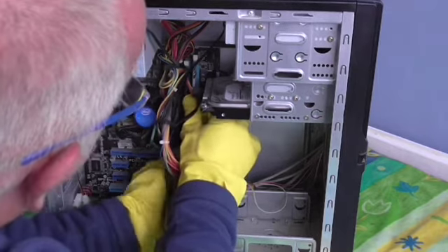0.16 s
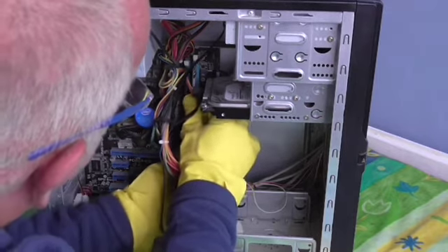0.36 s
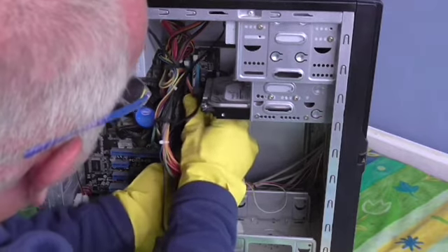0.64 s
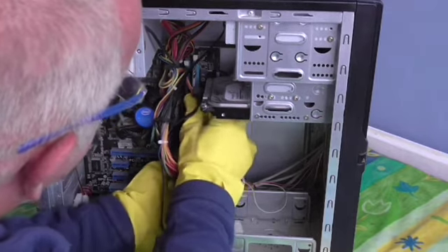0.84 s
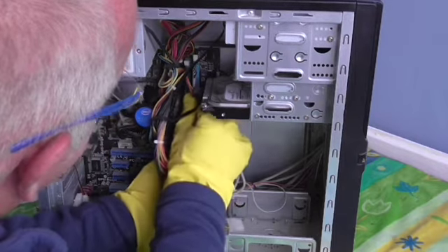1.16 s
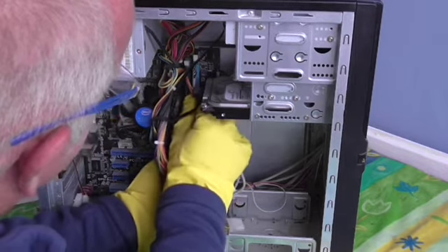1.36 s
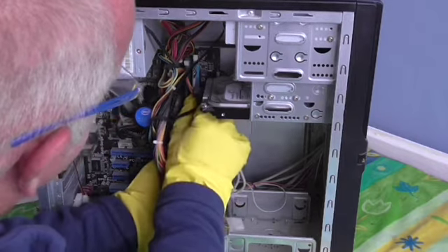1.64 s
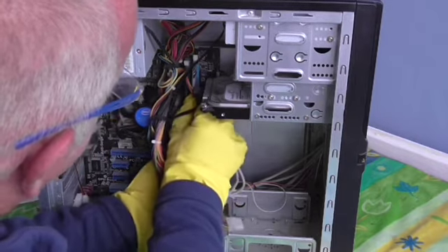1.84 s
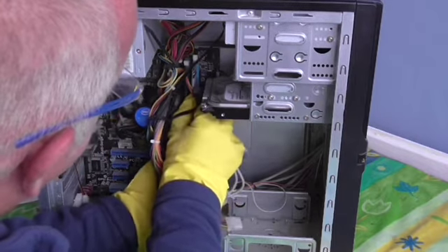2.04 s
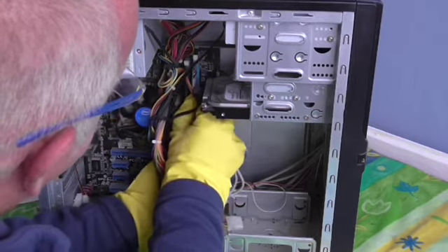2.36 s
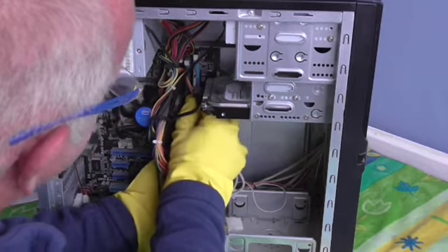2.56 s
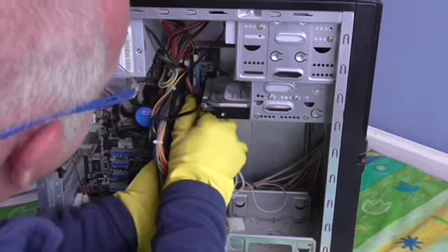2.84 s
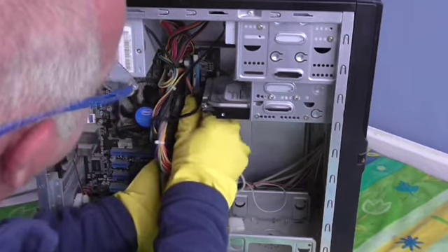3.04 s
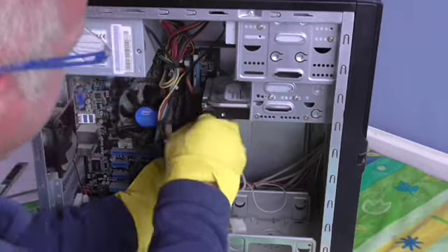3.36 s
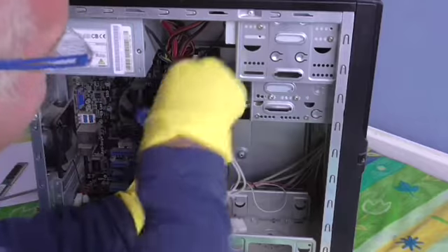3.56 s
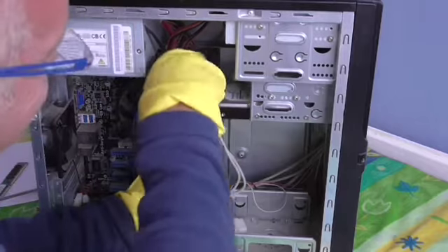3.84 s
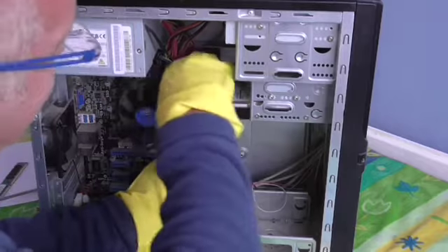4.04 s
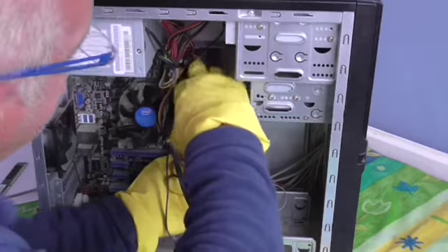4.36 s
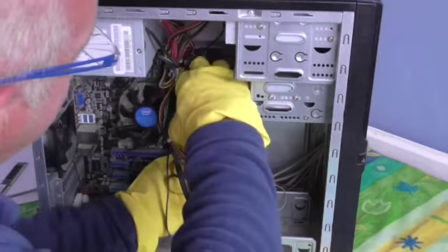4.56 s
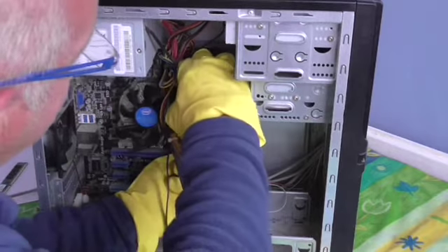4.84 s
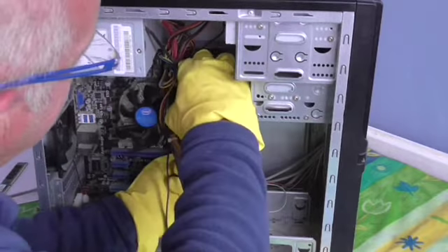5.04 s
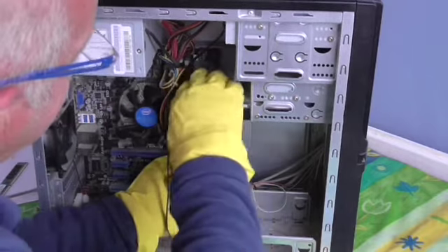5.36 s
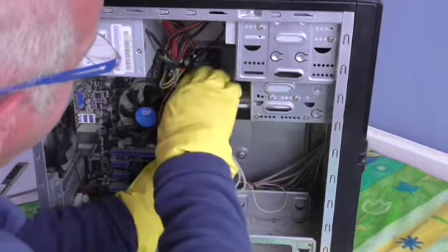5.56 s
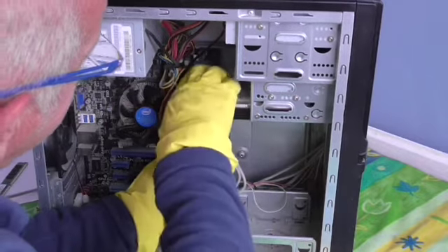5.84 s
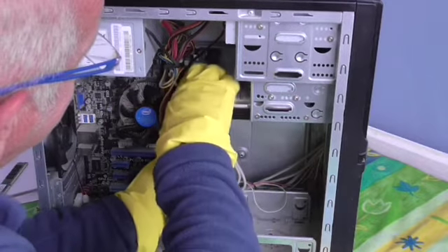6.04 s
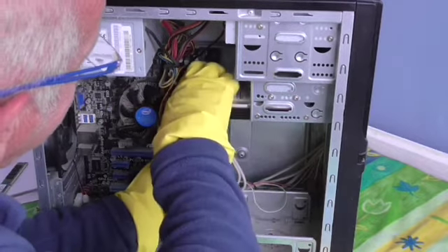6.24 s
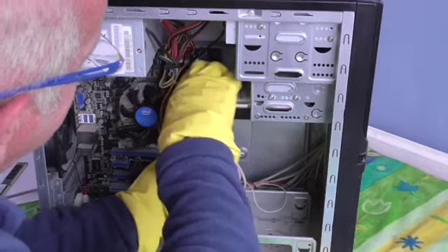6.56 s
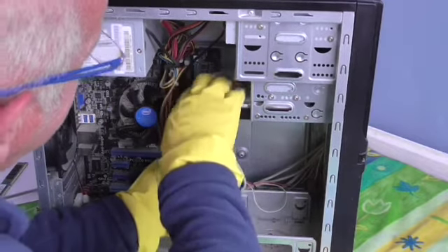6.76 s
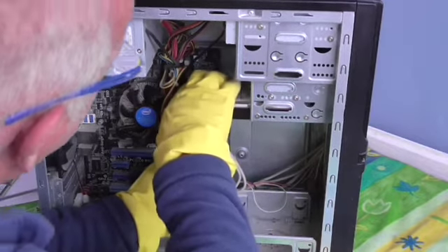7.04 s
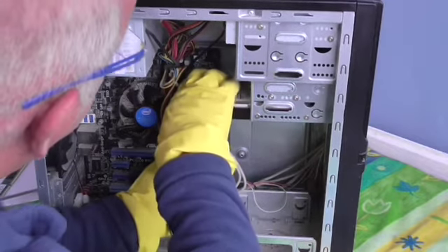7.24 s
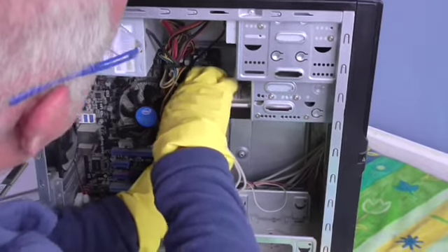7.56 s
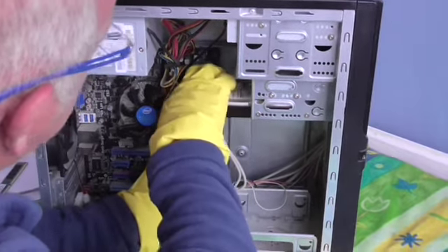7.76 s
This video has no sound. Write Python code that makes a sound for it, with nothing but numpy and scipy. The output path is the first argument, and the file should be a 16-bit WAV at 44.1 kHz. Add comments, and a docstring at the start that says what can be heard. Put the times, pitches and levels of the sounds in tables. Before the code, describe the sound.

Irregular small plastic ticks and dull glove rubbing come from inside a hollow metal computer case. Crisp latch clicks stand out at about two and a half, five and six seconds, with a loud tick and rounded thump shortly after four. Fabric hisses and cable sleeves rasp briefly between them. Close microphone, short metallic reflections, small room, quiet steady hiss with a barely audible high whine.

```python
"""Gloved hands seat a memory stick inside an open steel computer case, in a small quiet room.
Snaps and cable ticks are short chatter, coloured by the struck part, that rings latch, steel and room.
Gloves and sleeves rub as clumps of tiny slips, and cable sleeves rasp in a narrow band of slips.
A padded hand bumps the case with rounded pulses, and the side panel booms softly.
Under it, in both channels, lie filtered room noise, microphone hiss and a faint electronic whine."""
import sys
import numpy as np
from scipy import signal
from scipy.fft import rfft, irfft
from scipy.io import wavfile
from scipy.ndimage import uniform_filter1d

SR = 44100
rng = np.random.default_rng(int(sys.argv[2]) if len(sys.argv) > 2 else 0)


def generate_wav(signal):
    """Clip the signal to [-1, 1] and save it as 16-bit WAV at the path in sys.argv[1]."""
    frames = np.transpose(np.atleast_2d(signal))
    scaled = np.clip(frames, -1, 1) * 32767
    pcm = np.round(scaled).astype(np.int16)
    wavfile.write(sys.argv[1], SR, pcm)


N = 348831  # length in samples

# Still air and microphone hiss. Each row: frequency in Hz, relative density in dB per Hz.
AIR_SPECTRUM = [(15, -16), (25, -48.5), (107, 0.5), (160, -6), (233, -0.5), (457, -3.5), (598, -3.5),
                (1270, -9.5), (1710, -10), (3000, -20.5), (3830, -19), (7700, -22.5), (8350, -22),
                (14300, -25), (15500, -29)]
AIR_DB, WHINE_DB, WHINE_HZ = -57.5, -82, 7670  # rms levels in dB, mean pitch of the whine in Hz
# The decay of the room. Each row: frequency in Hz, time to fall by 60 dB in s.
ROOM_DECAY = [(100, 0.87), (500, 0.44), (1700, 0.33), (5000, 0.29), (9000, 0.26), (15000, 0.096)]

# How much the restless sleeves stir. Each row: time in s, relative level of their rubbing in dB.
SLEEVE_STIR = [(0, -60), (.8, -61), (1.4, -64.5), (1.9, -62.5), (2.43, -72), (2.9, -58.5), (4.0, -56),
               (4.65, -63), (5.2, -63), (5.6, -67), (6.3, -64), (7.1, -110), (7.9, -56)]
STIR_PRESS_DB, STIR_HISS_DB = -3, -13.5  # pressing and hiss in that stirring, relative to its rubbing
# A glove slides over cables and board. Each row: start in s, length before release in s,
# time to swell in s, relative level of dull rubbing in dB, relative level of fabric hiss in dB.
GLOVE_SLIDES = [(0.099, 0.36, 0.016, -56, -60), (0.246, 0.16, 0.038, -46, -57),
                (0.424, 0.13, 0.026, -56.5, -59), (0.62, 0.042, 0.036, -52, -59),
                (0.838, 0.13, 0.032, -54, -62.5), (1.081, 0.03, 0.022, -50, -60.5),
                (1.195, 0.03, .02, -57, -81), (2, 0.047, .015, -53.5, -73),
                (2.242, 0.036, 0.0096, -59.5, -72), (2.675, 0.046, .03, -54.5, -57),
                (3.081, 0.083, 0.014, -48.5, -61), (3.177, 0.043, 0.024, -64, -59),
                (3.265, 0.096, 0.017, -50, -61), (3.384, 0.12, 0.028, -50.5, -56),
                (3.577, 0.18, .03, -60, -60), (3.679, 0.14, 0.027, -48.5, -66),
                (3.887, 0.47, 0.034, -51.5, -61), (4.079, 0.077, 0.04, -60, -53.5),
                (4.157, 0.054, .01, -42.5, -51), (4.25, 0.047, 0.014, -51, -51),
                (4.32, .1, 0.014, -44, -67), (4.47, 0.019, 0.028, -49.5, -61),
                (4.752, 0.102, 0.09, -55, -52), (5.238, 0.15, 0.08, -48.5, -54),
                (5.431, 0.12, 0.022, -51, -55.5), (5.59, 0.057, 0.023, -58, -61.5),
                (6.583, 0.038, 0.021, -49, -67), (6.65, 0.15, 0.025, -62, -62.5),
                (6.76, 0.069, 0.028, -60, -59), (7.392, 0.023, 0.018, -59, -57.5),
                (7.538, 0.055, 0.031, -44.5, -56.5), (7.75, 0.089, 0.07, -50, -46)]
SLIDE_SAG_DB_PER_S, SLIDE_RELEASE_DB_PER_S = 18, 167
# A hand leans on the board and the panel groans. Each row: start in s, length before release in s,
# relative level in dB.
HAND_PUSHES = [(0.106, .04, -55.5), (0.295, 0.11, -54), (0.657, 0.04, -74), (0.9, .13, -55.5),
               (1.068, 0.073, -47.5), (1.2, 0.044, -53.5), (2, 0.066, -45.5), (2.219, 0.066, -48),
               (2.733, 0.028, -46), (2.922, 0.038, -55.5), (3.08, .08, -50), (3.71, .045, -55),
               (3.822, 0.093, -49), (4.105, 0.1, -54), (4.303, 0.12, -37), (4.44, 0.066, -46.5),
               (5.09, .06, -54), (5.327, .05, -47), (6.558, .04, -47.5), (6.711, 0.089, -50),
               (7.387, 0.14, -52), (7.51, 0.22, -45.5), (7.791, 0.17, -43)]
PUSH_ATTACK_S, PUSH_SAG_DB_PER_S, PUSH_RELEASE_DB_PER_S = 0.018, 8.5, 146
# Spectra of pressing, dull rubbing and fabric hiss. Each row: frequency in Hz, relative density in dB per Hz.
PRESS_SPECTRUM = [(30, -62), (70, -23), (115, -7), (165, 3), (200, -2.5), (245, 1), (330, 0.5), (430, -1),
                  (600, -8), (1000, -36.5), (2000, -64)]
RUB_SPECTRUM = [(30, -45), (150, -14.5), (400, 4.5), (600, 6), (850, 3), (1100, -3.5), (1600, -0.5),
                (1950, -8.5), (2500, -13), (4000, -91), (8000, -27.5)]
HISS_SPECTRUM = [(100, -37), (1200, 0), (2400, 3.5), (3000, 0), (4200, 7), (6500, 4), (8500, -0.5),
                 (10500, -8), (14500, -10), (16000, -35)]

# Modes of the large side panel, of the steel frame with its board, and of the springy latch.
# Each row: frequency in Hz, relative level in dB, time to fall by 60 dB in s.
PANEL_MODES = [(92, -22, .45), (179, -7, .43), (237, 0, .7), (273, -4, .7), (323, -7, .6), (433, -6, .33),
               (560, -12, .6), (651, -9, .5)]
CASE_MODES = [(390, -7, .25), (435, 2, .33), (500, -4, .25), (549, -5, .21), (705, -9, .4), (780, -6, .3),
              (858, -6, .38), (1064, -5, .3), (1330, -7, .23), (1415, -5, .25), (1509, -5, .3),
              (1792, 0, .3), (1859, -1, .25), (2302, -3, .2), (3361, -5, .2), (3740, -2, .25),
              (5128, -2, .19)]
LATCH_MODES = [(1712, -1, .2), (3456, -5, .23), (4200, -6, .22), (4463, -1, .4), (4920, -1, .3),
               (5055, -4, .19), (5475, -2, .26), (6600, -7, .22), (7391, -7, .33), (8576, -6, .27)]

# Cables and plugs tick under the fingers. Each row: start in s, relative level in dB,
# brightness in dB per octave, note in Hz, strength of the note in dB, relative echo level in dB.
CABLE_TICKS = [(0.188, -23, -3.5, 1720, 7.5, -12), (.304, -18.5, -3.5, 1367, 16.5, 6.5),
               (0.36, -19, -4, 4500, 14, -3), (.492, -18, -4.5, 1730, 6.5, -2),
               (0.571, -27.5, -11, 1880, 11, 1), (.653, -21, -1.5, 770, 17, -1),
               (.674, -16.5, -7, 1070, 13.5, 0), (0.7252, -18, 0.5, 4020, 16.5, -5.5),
               (0.8968, -14.5, -4.5, 1600, 11, -5), (1.034, -26, -4.5, 1760, 7, 5.5),
               (1.213, -33.5, 3, 1076, 31, -4), (1.475, -34, 0.5, 2600, 21, -16),
               (1.5618, -11.5, -3.5, 6900, 9, -8.5), (1.8, -23, -2, 6330, 1.5, 2),
               (2.005, -19.5, -3, 4360, 10, -3), (2.285, -31, -3.5, 4180, 14, -3),
               (2.9595, -22.5, -2.5, 6400, 1, 5), (3.265, -21, -6, 1940, 2, 3.5),
               (3.512, -21, -3.5, 3200, 14, -1), (3.521, -18, -5, 3560, 11, -3.5),
               (3.7324, -14.5, -3.5, 1470, 4, 0), (4.1551, -5, -1.5, 1660, -7, 0),
               (4.386, -19.5, -13, 1870, 2, 1.5), (4.434, -19.5, -4.5, 4130, 15, -3),
               (4.4921, -25, -4, 1630, 9, 6), (4.602, -14.5, -0.5, 6000, 5, -1),
               (5.4537, -28.5, -3, 4260, 12, 8), (5.8502, -22, -7, 1090, 10, 3.5),
               (5.9933, -26, -3, 1740, 8, 1), (6.0429, -26.5, -9.5, 1720, 16, -7),
               (6.0772, -19, -6, 1646, 18, -4), (6.8156, -17, -2.5, 4600, 11, -2.5),
               (7.5427, -21.5, -4.5, 540, -9, 10.5), (7.771, -16.5, -7, 616, -14, 7),
               (7.7884, -16.5, -5.5, 1160, 12.5, 8.5)]
TICK_HUMP_DB, TICK_HUMP_OCTAVES = 5.5, 1  # a broad hump around the note of every tick
TICK_CHATTER_S, TICK_LATCH_DB = .0036, -20  # all rattle alike and barely stir the latch
# The latches and the slot snap. Each row: start in s, colour in dB at 500, 1700, 4500 and 7500 Hz,
# note of the struck part in Hz, strength of the note in dB, chatter in s, relative echo level in dB,
# latch ring in dB.
LATCH_SNAPS = [(2.4867, -13, -16, -17, -22, 3700, 5, .0022, -15, -20),
               (2.4901, 5, 10.5, 11, 9.5, 3700, 7, .0036, -1, -25),
               (2.609, -17, -7, -7, -5, 4430, 6, .0028, -3, -6),
               (2.611, -5.5, 2, 2, -6, 5160, 5, .0053, 1.5, -3.5),
               (2.809, 2.5, -.5, -19, -25.5, 550, 5, .0053, 0, -15),
               (4.897, -2, -1.5, -8.5, -12.5, 3850, 5, .0035, 2.5, -13),
               (4.9006, 10, 9, 2.5, -7.5, 3970, 5, .004, -1, -14),
               (6.1164, -4, 8.5, -9, -9, 2100, 5, .0065, 3, -24),
               (6.1273, 6.5, 8, 3.5, -2.5, 5130, 7, .0058, 1, -11),
               (6.133, 8, 3.5, -10, -17, 600, 4, .0043, 5, -7),
               (6.4161, -5, -8.5, -27, -33, 4200, 10, .0064, 0, -4.5)]
# Short-lived resonances of the plastic slot and the board around it.
# Each row: frequency in Hz, width in Hz, boost in dB.
SLOT_RESONANCES = [(430, 130, 4), (1800, 260, 4), (2330, 200, 5), (3700, 300, 7), (5080, 220, 6),
                   (5790, 200, 7), (6100, 160, 6), (6470, 220, 7), (7950, 260, 8), (8450, 220, 7),
                   (9350, 200, 5)]
# The hollow of the case colours every click. Each row: frequency in Hz, gain in dB.
CASE_HOLLOW = [(30, -28), (100, -14), (250, -4), (430, -1), (700, 0.5), (1150, -2.5), (1800, -2.5),
               (2800, -5.5), (3750, -8), (4400, -2.5), (5700, -4), (8300, -5.5), (11000, -13.5),
               (15500, -18)]

# Soft blows on the case. Each row: start in s, relative level in dB, contact time in s.
HAND_BUMPS = [(1.09, -26, 0.0035), (1.13, -8.5, 0.0079), (2.027, -26, 0.0019), (2.244, -8, 0.0084),
              (2.743, -19, 0.0049), (3.15, -32, 0.0025), (3.85, -32, 0.0036), (4.171, -25, 0.0021),
              (4.3174, -11, 0.0018), (4.322, -3, 0.0027), (4.3349, 3, 0.0054), (4.353, -10, 0.0041),
              (4.3698, -8, 0.0032), (4.4075, -26, 0.0013), (5.111, -16, 0.0097), (5.36, -17, 0.0052),
              (6.587, -15, 0.0043), (6.748, -15.5, 0.0056), (7.838, -17, 0.0043), (7.875, -23, 0.0029)]
# The glove drags over cable sleeves. Each row: start in s, end in s, relative level in dB, band centre in Hz.
SLEEVE_RASPS = [(3.502, 3.525, -43.5, 1660), (4.083, 4.176, -48, 1600), (4.547, 4.654, -63.5, 1600),
                (4.733, 4.877, -53, 1540), (5.3, 5.436, -51.5, 1600), (5.419, 5.574, -58.5, 1750),
                (6.672, 6.853, -61, 1660)]
EDGE_HZ = 15800  # upper band limit of the recorder


def amp(db):
    """Decibels to gain."""
    return 10 ** (np.asarray(db) / 20)


def unit(x):
    """Scales to rms 1."""
    return x / np.sqrt(np.mean(x ** 2) + 1e-20)


def read(points, hz):
    """Joins (Hz, value) points on a log-frequency axis."""
    f, value = np.transpose(points)
    return np.interp(np.log(hz + 1), np.log(f + 1), value)


def add(mix, s, sound):
    """Mixes a sound in at a time in seconds."""
    part = mix[max(round(s * SR), 0):][:len(sound)]
    part += sound[:len(part)]


def tint(x, points):
    """Gives a full-length sound a spectrum."""
    gain = amp(read(points, np.fft.rfftfreq(N, 1 / SR)))
    return irfft(rfft(x) * gain, N)


def convolve(x, response):
    """Plays a sound through a one- or two-channel response."""
    return signal.fftconvolve(np.atleast_2d(x), np.atleast_2d(response), axes=1)[:, :N]


def ring(modes):
    """A struck body as a sum of dying sines, of energy 1 in all."""
    t = np.arange(SR) / SR
    y = sum(amp(db - 60 * t / t60) * np.cos(2 * np.pi * hz * t) for hz, db, t60 in modes)
    return y / np.linalg.norm(y)


def air(width=0.96):
    """Steady room noise and hiss, with a faint electronic whine whose phase wanders."""
    mid, side = tint(rng.standard_normal((2, N)), AIR_SPECTRUM)
    noise = unit(np.array([mid + width * side, mid - width * side]))
    wander = np.cumsum(rng.standard_normal(N)) * 0.01  # radians
    whine = unit(np.sin(2 * np.pi * (WHINE_HZ * np.arange(N) / SR) + 2 * np.pi * wander))
    return amp(AIR_DB) * noise + amp(WHINE_DB) * whine


def room(width=0.4, rise_s=0.00022, early_db=4, early_s=0.0037):
    """Dense decaying echoes: stronger at first from the near case walls, then from the room."""
    hz, t, z = signal.stft(rng.standard_normal((2, SR // 2)), SR, nperseg=256)
    z[1] *= ((hz + 150) / (hz + 350))[:, None]  # the bass is more alike in both channels
    decay = amp(-60 * t / read(ROOM_DECAY, hz)[:, None])
    mid, side = signal.istft(z * decay, SR, nperseg=256)[1]
    t = np.arange(len(mid)) / SR
    onset = (1 - np.exp(-t / rise_s)) * amp(early_db * np.exp(-t / early_s))
    tail = np.array([mid + width * side, mid - width * side]) * onset
    return tail / np.linalg.norm(tail[0])  # energy 1 in the left channel


def echoes(x, count=3, turn_s=.45):
    """The moving arms keep changing the echo paths: three responses take turns."""
    turn = np.arange(N) / SR / turn_s
    nearness = (np.maximum(1 - abs((turn + k) % count - 1), 0) for k in range(count))
    return sum(convolve(x * np.sqrt(near), room()) for near in nearness)


def gesture(length, attack_s, sag_db_per_s, release_db_per_s):
    """The strength of one hand movement: attack, sagging hold, release."""
    t = np.arange(SR) / SR
    fall_db = -sag_db_per_s * t - release_db_per_s * np.maximum(t - length, 0)
    return np.minimum(t / attack_s, 1) * amp(fall_db)


def effort():
    """Levels in dB of pressing, rubbing and hiss: pushes and slides add power to the stirring sleeves."""
    stir_db = np.interp(np.arange(N) / SR, *np.transpose(SLEEVE_STIR))
    press, rub, hiss = (amp(stir_db + db) ** 2 for db in (STIR_PRESS_DB, 0, STIR_HISS_DB))
    for start, length, db in HAND_PUSHES:
        push = gesture(length, PUSH_ATTACK_S, PUSH_SAG_DB_PER_S, PUSH_RELEASE_DB_PER_S)
        add(press, start, (amp(db) * push) ** 2)
    for start, length, swell_s, rub_db, hiss_db in GLOVE_SLIDES:
        slide = gesture(length, swell_s, SLIDE_SAG_DB_PER_S, SLIDE_RELEASE_DB_PER_S)
        add(rub, start, (amp(rub_db) * slide) ** 2)
        add(hiss, start, (amp(hiss_db) * slide) ** 2)
    return 10 * np.log10([press, rub, hiss])


def friction(level_db, spectrum, modes, slips_per_s, uneven_db, clump_db, ring_db, echo_db):
    """Tiny slips of uneven size come in clumps, ring the steel and echo, as strong as the hand moves."""
    clumps = unit(uniform_filter1d(rng.standard_normal(N), size=500))
    size_db = uneven_db * np.minimum(rng.exponential(1, N), 4) + clump_db * clumps
    sizes = amp(size_db) * rng.standard_normal(N)
    slips = tint(sizes * (rng.random(N) < slips_per_s / SR), spectrum)
    body = slips + amp(ring_db) * convolve(slips, ring(modes))
    return amp(level_db) * unit(body + amp(echo_db) * echoes(body))


def hands(press_db=-1, rub_db=0, hiss_db=-0.5):
    """Pressing makes the panel groan, cables rub dully, and the glove fabric hisses."""
    press, rub, hiss = effort()
    groan = friction(press + press_db, PRESS_SPECTRUM, PANEL_MODES, slips_per_s=970,
                     uneven_db=2.0, clump_db=2.0, ring_db=-26.5, echo_db=-1)
    dull_rub = friction(rub + rub_db, RUB_SPECTRUM, CASE_MODES, slips_per_s=1200,
                        uneven_db=3.5, clump_db=6.0, ring_db=-31, echo_db=3)
    fabric = friction(hiss + hiss_db, HISS_SPECTRUM, CASE_MODES, slips_per_s=2900,
                      uneven_db=0.0, clump_db=3, ring_db=-29, echo_db=1.0)
    return groan + dull_rub + fabric


def tick(s, db, brightness, note_hz, note_db, echo_db):
    """A light contact as a small snap: its colour slopes with hardness and rises around its note."""
    hz = np.array([500, 1700, 4500, 7500])
    hump = np.exp(-(np.log2(hz / note_hz) / TICK_HUMP_OCTAVES) ** 2)
    colour_db = db + brightness * np.log2(hz / hz[1]) + TICK_HUMP_DB * hump
    return s, *colour_db, note_hz, note_db, TICK_CHATTER_S, echo_db, TICK_LATCH_DB


def chatter(length, first_contact=2.5, size=2048, count=8):
    """A first hard contact and a short rattle, fading over the given time, with no colour of its own."""
    fade = np.exp(-(np.arange(size) / SR / length) ** 2) + 1e-9
    force = rng.standard_normal(size) * fade
    force[0] = first_contact
    for _ in range(count):  # even out the spectrum, and keep the rattle short
        force = irfft(np.exp(1j * np.angle(rfft(force)))) * fade ** (1 / count)
    return force / np.linalg.norm(force)


def snap(colour_db, note_hz, note_db, length, note_width=0.07, trim_db=-2.5, size=2048):
    """Chattering plastic, coloured by the part that is struck, by the slot and by the hollow of the case."""
    hz = abs(np.fft.fftfreq(size, 1 / SR))
    part_db = read(list(zip([500, 1700, 4500, 7500], colour_db)), hz)
    peaks = [*SLOT_RESONANCES, (note_hz, 2 * note_width * note_hz, note_db)]
    resonance_db = sum(db / (1 + (2 * (hz - centre) / width) ** 2) for centre, width, db in peaks)
    log_gain = np.log(amp(part_db + read(CASE_HOLLOW, hz) + resonance_db + trim_db))
    # causal: nothing sounds before the blow
    response = np.fft.ifft(np.exp(np.conj(signal.hilbert(log_gain)))).real
    return signal.fftconvolve(chatter(length), response[:size // 2])


def twang():
    """The latch swings widely for a moment, then rings on faintly."""
    swing = 1 + 3 * np.exp(-np.arange(SR) / SR / .009)
    y = ring(LATCH_MODES) * swing
    return y / np.linalg.norm(y)


def clicks(direct_db=-1, case_db=-17, spread=.05, wall_delay_samples=9):
    """Each tick or snap is heard straight, through the ringing latch and case, and as echoes."""
    direct, sent, sprung = np.zeros((3, N))
    contacts = LATCH_SNAPS + [tick(*row) for row in CABLE_TICKS]
    for s, *colour_db, note_hz, note_db, length, echo_db, latch_ring_db in contacts:
        click = snap(colour_db, note_hz, note_db, length)
        share = min(amp(latch_ring_db), .85)
        crack = np.sqrt(1 - share ** 2) * click  # what goes into the latch is missing from the crack
        add(sprung, s, share * click)
        add(direct, s, crack)
        add(sent, s, amp(echo_db) * crack)
    case_ring = amp(case_db) * convolve(direct, ring(CASE_MODES))
    latch_ring = convolve(sprung, twang()) / np.sqrt(2)
    # a side wall reaches the two channels with opposite sign
    wall = spread * np.roll(direct, wall_delay_samples) * np.array([[1], [-1]])
    return amp(direct_db) * (direct + wall) + case_ring + latch_ring + echoes(sent)


def bumps(level_db=17, boom_db=-15, echo_db=-4):
    """A padded hand pushes the case with rounded pulses; the side panel booms."""
    force, t = np.zeros(N), np.arange(SR // 20) / SR
    for s, db, contact in HAND_BUMPS:
        u = 2 * np.pi * t / contact
        push = u * np.exp(-u)
        add(force, s, amp(db) * push / push.sum())
    radiation = signal.butter(4, 195, "high", fs=SR, output="sos")
    force = signal.sosfilt(radiation, force)  # small panels radiate little bass
    boom = amp(boom_db) * convolve(force, ring(PANEL_MODES))
    return amp(level_db) * (force + boom + amp(echo_db) * echoes(force))


def rasps(slips_per_s=600, width_hz=500, level_db=-5, echo_db=1):
    """Rubber sticks and slips at random moments; each slip briefly rings one resonance."""
    out = np.zeros(N)
    for start, end, db, hz in SLEEVE_RASPS:
        n = int((end - start) * SR)
        slips = rng.standard_normal(n) * (rng.random(n) < slips_per_s / SR)
        band = signal.butter(2, [hz - width_hz / 2, hz + width_hz / 2], "band", fs=SR, output="sos")
        rasp = unit(signal.sosfilt(band, slips)) * signal.windows.tukey(n, .5)
        add(out, start, amp(db + level_db) * rasp)
    return out + amp(echo_db) * echoes(out)


def scene():
    """Everything that sounds at the open case."""
    return air() + hands() + clicks() + bumps() + rasps()


def record(dry):
    """The recorder's band limit."""
    low_pass = signal.firwin(511, EDGE_HZ, window=("kaiser", 9), fs=SR)
    return signal.oaconvolve(dry, low_pass[None], "same")


dry = scene()
out = record(dry)
generate_wav(out)
```